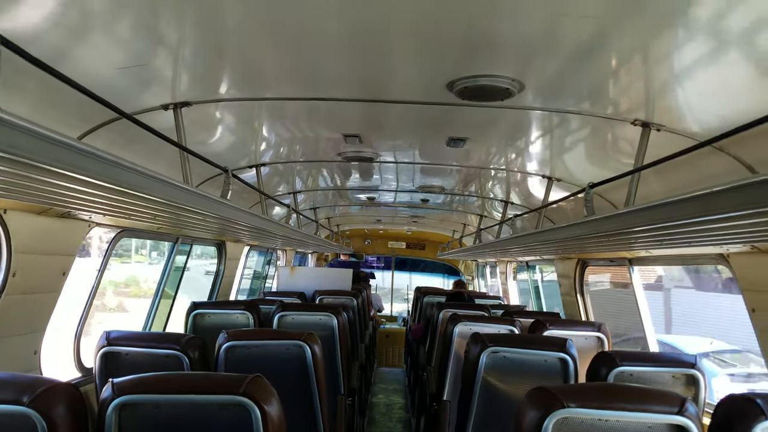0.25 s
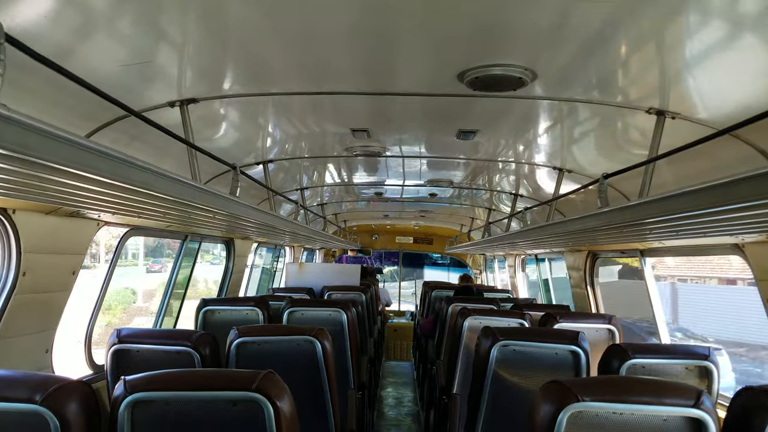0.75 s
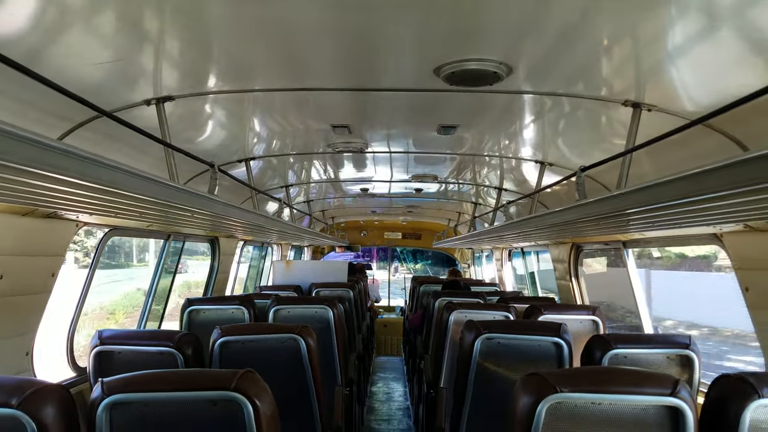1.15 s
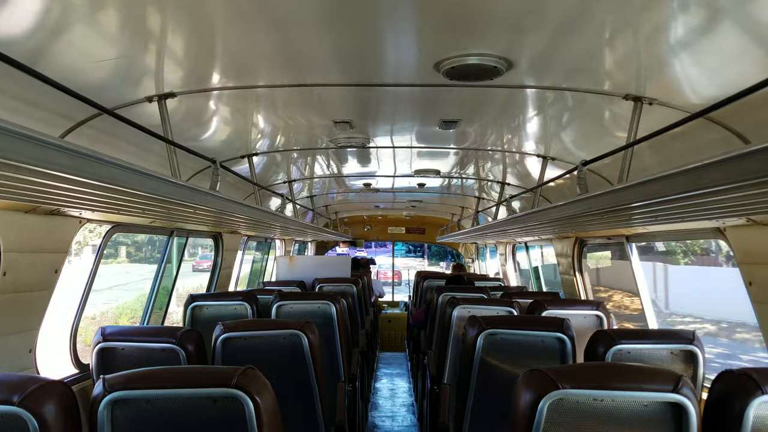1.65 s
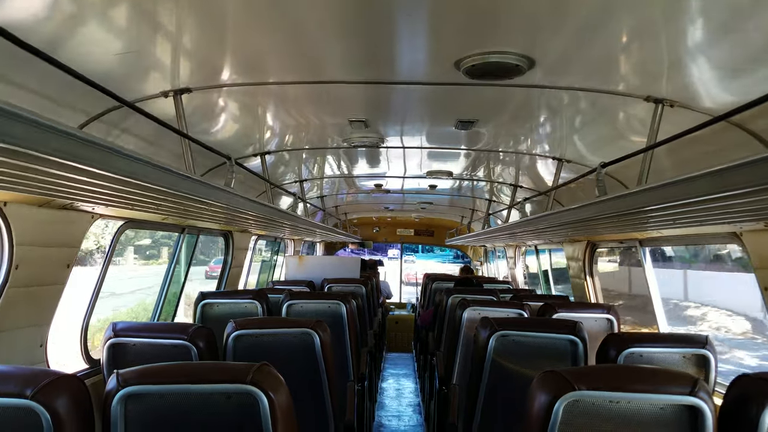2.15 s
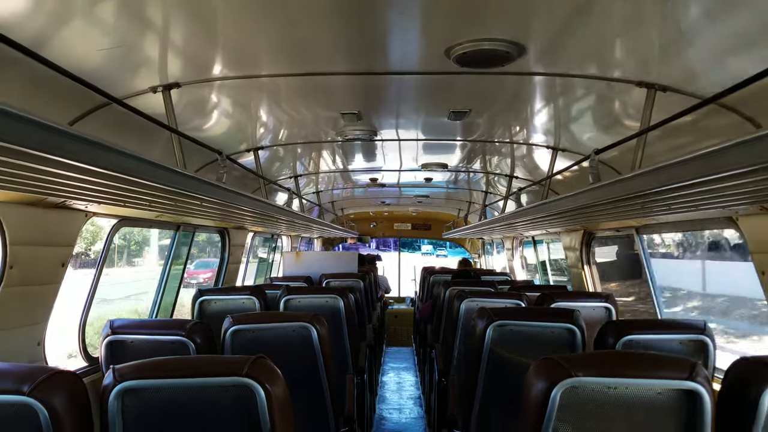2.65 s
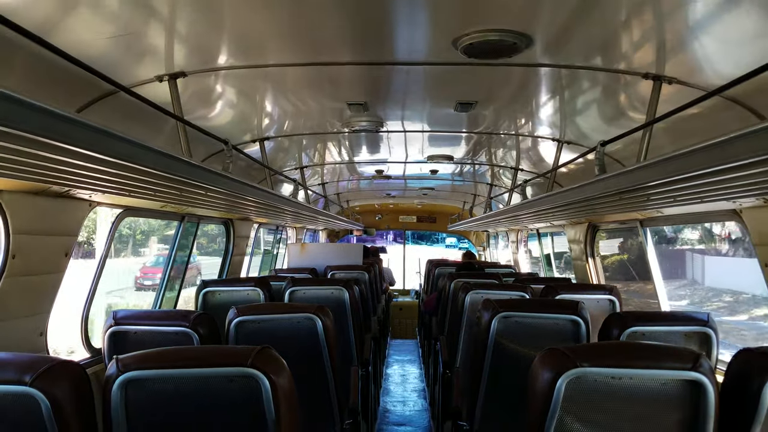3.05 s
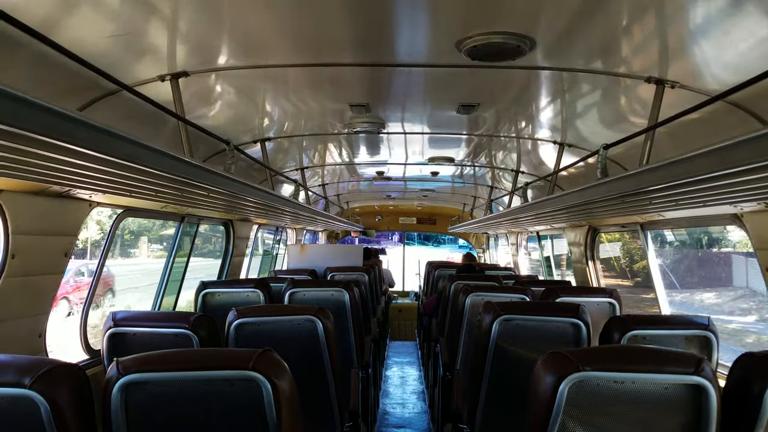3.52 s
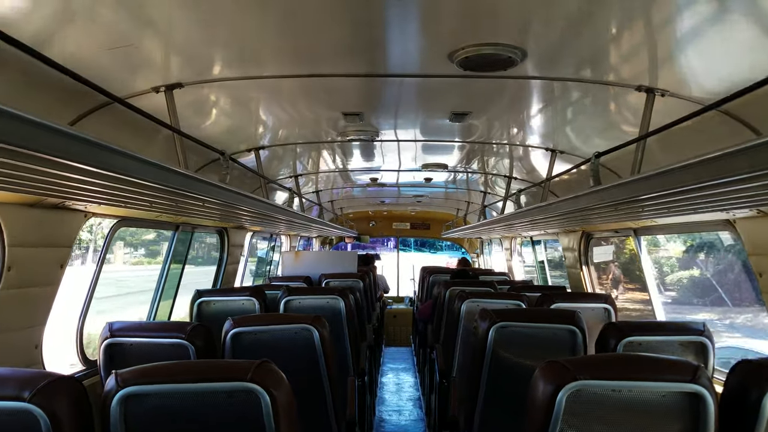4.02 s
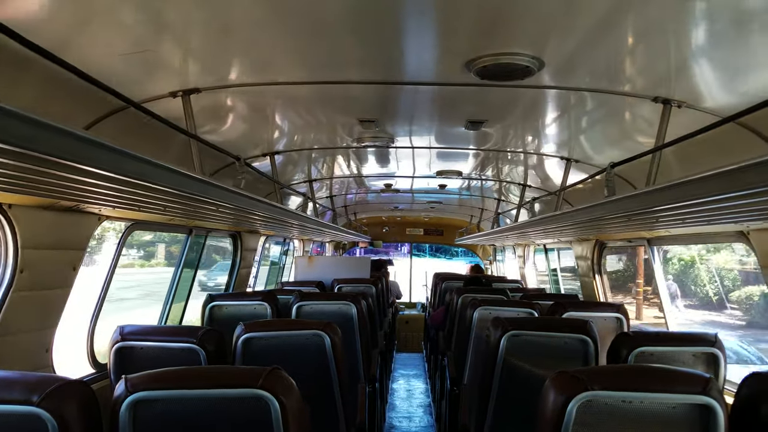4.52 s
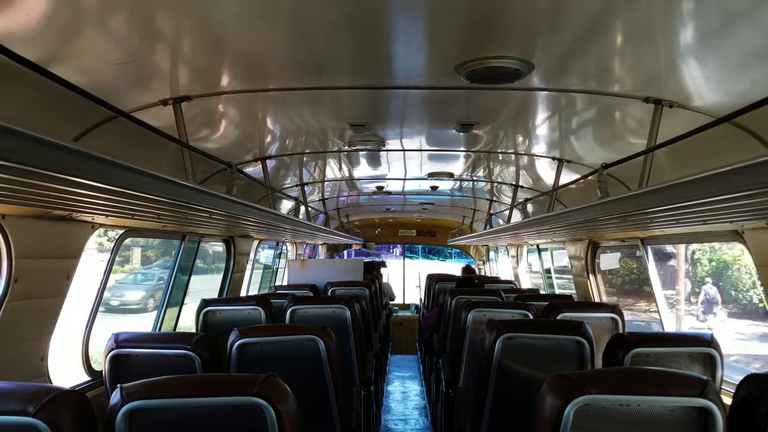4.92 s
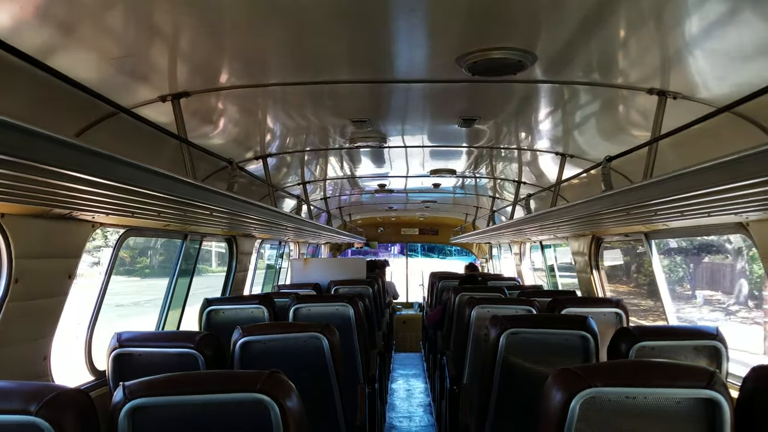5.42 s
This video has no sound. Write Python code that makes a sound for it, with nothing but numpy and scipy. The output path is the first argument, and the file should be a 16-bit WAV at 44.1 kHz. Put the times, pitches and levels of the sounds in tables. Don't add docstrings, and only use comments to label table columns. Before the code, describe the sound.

The sound starts already full: inside an old bus, a large diesel pulls at lowish revs, a deep, throbbing drone with several low tones beating together. From 0 to about 4.5 seconds its pitch climbs steadily, nearly doubling, and the cabin booms differently as each tone passes through its resonances. Beneath lie tyre rumble and soft road thuds, heavier after about 2.7 seconds; above, a grainy metallic roar, hissing valve clatter that grows with speed, humming panels and a faint high rattle of trim. Around 4.0 to 4.3 seconds a hard bump thuds, with a small bright tick and brief faint squeaks. The engine peaks near 4.5 seconds, loses its hard pull and coasts slightly lower to the end at about 5.7, with a thin gear whine more exposed from 4.6 and a flurry of fine rattles near 5.2. Enclosed stereo pickup, strong bass, loudest booms slightly rounded.

```python
import sys
import numpy as np
from scipy import signal
from scipy.fft import rfft, irfft, next_fast_len
from scipy.io import wavfile

SR = 44100
rng = np.random.default_rng(int(sys.argv[2]) if len(sys.argv) > 2 else 0)


def waveform_to_disk(signal):
    frames = np.transpose(np.atleast_2d(signal))
    scaled = np.clip(frames, -1, 1) * 32767
    samples = np.round(scaled).astype(np.int16)
    wavfile.write(sys.argv[1], SR, samples)


def gain_from_decibels(decibels):
    exponent = np.asarray(decibels, float) / 20
    return 10 ** exponent


N = 250047
TIME_S = np.arange(N) / SR
LENGTH = next_fast_len(N)
HZ = np.arange(1, LENGTH // 2 + 2) * SR / LENGTH

# [t/s, speed/turns per s]
CRANK_SPEED = [
    (0.0, 20.12),
    (0.8, 23.35),
    (2.0, 28.05),
    (3.6, 34.03),
    (4.3, 36.22),
    (4.52, 36.7),
    (4.72, 36.35),
    (5.2, 36.0),
    (5.45, 34.93),
    (5.67, 34.3),
]
MEAN_TURNS_PER_S = 30
FUEL_CUT_S, FUEL_FADE_S = 3.9, 0.63

# [multiple, level under load/dB, change when coasting/dB]
CRANK_MAINS = [(1, -1.4, 6.9), (3, -6, -1.3), (4, -4.5, -1), (6, -1.1, -16.8)]
SHAFT_MAINS = [(1, -.2, 1.5), (2, -1.7, -.8), (3, -6.1, .2), (4, -4.6, -3.5)]
# [f/Hz, width/Hz, level/dB rms]
CRANK_MODES = [(24.2, 4, -25.6), (36.1, 6, -26.5), (66, 25, -24), (83.7, 25, -15), (108.7, 2.2, -11),
               (122.7, 3.5, -18.5), (132.7, 6.4, -22.5), (147.8, 5, -14.5), (153.5, 18, -12),
               (195.9, 34, -12.5)]
SHAFT_MODES = [(40.5, 7.4, -21.5), (48.3, 6.2, -17), (80, 10, -23), (104.1, 8.5, -16), (118.3, 18, -9.5),
               (132, 11, -8), (137.8, 5.2, -8.5), (155.8, 6.1, -19.5), (164, 4, -21), (210, 25, -25)]
BETWEEN_MODES_DB = -38
# [multiple, level/dB]
CRANK_MINORS = [(2, 1), (5, 3.5), (7, -7), (8, -7), (9, 1.1), (10, -2), (11, -3.5), (12, -10.5)]
SHAFT_MINORS = [(5, 2), (6, -6), (8, -5.5)]
UPPER_MINORS = [(k, 0) for k in range(13, 27)]
# [f/Hz, level/dB rms]
CRANK_PATH = [(40, -38.5), (60, -33.5), (73, -28), (105, -36.5), (120, -25), (135, -28), (160, -23.5),
              (174, -34.5), (183, -23), (196, -27.5), (212, -23), (225, -33.5), (270, -32), (440, -36)]
SHAFT_PATH = [(140, -28), (156, -31.5), (167, -28.5), (180, -37), (195, -27), (214, -24), (230, -32),
              (260, -31.5), (330, -27), (420, -31.5)]
UPPER_PATH = [(250, -52), (400, -44), (570, -42), (700, -47), (900, -53.5), (1200, -57.5), (1500, -65)]
SHAFT_RATIO, GEAR_TEETH = 1.415, 27

# [f/Hz, density/dB per Hz]
THUD_SPECTRUM = [(8, -6.5), (20, -2.5), (40, -1), (65, -2), (85, -9.5), (120, -27)]
BOOM_SPECTRUM = [(45, -26.5), (70, -9), (100, 1.5), (140, 3.5), (180, -6), (210, 2), (260, -22.5),
                 (330, -29.5), (450, -51)]
ROAR_SPECTRUM = [(140, -35.5), (240, -2), (334, -8.5), (392, -7.5), (460, -12.5), (564, -8.5), (624, -16.5),
                 (770, -13.5), (1100, -24), (1430, -57), (2420, -120)]
CLATTER_SPECTRUM = [(530, -36), (900, -5), (1180, -1.5), (1390, -5.5), (1780, -6), (2200, -8), (2810, -11),
                    (4000, -19), (5300, -26.5), (5800, -31), (6150, -38.5), (7000, -40), (8200, -48),
                    (11000, -60.5)]
RATTLE_SPECTRUM = [(6000, -36.5), (8000, -19.5), (10000, -16), (10800, -11.5), (11900, -3), (12500, -2),
                   (13500, -1), (14800, -0.5), (15900, -5)]
# [f/Hz, width/Hz, level/dB]
PANELS = [(565.9, 17, -32), (659, 17, -44), (761.4, 22, -47.5), (384, 30, -35), (141, 27, -25),
          (2192, 34, -55.5), (4080, 53, -66.5)]

# [t/s, thud level/dB, boom level/dB]
BUMPS = [
    (.8, 0, 4.5),
    (1.5, 0, 5),
    (3.2, 2.5, 1),
    (3.95, 10, 2),
    (4.2, 8.5, 3.5),
    (4.65, -1.5, 7),
    (5.4, 0, 4.5),
    (5.67, -1, 4),
]
BUMP_S = 0.3
# [t/s, level/dB]
HUM_SWELLS = [
    (.05, 11),
    (.35, 7),
    (1.8, 8.5),
    (2.35, 7),
    (3.8, 5.5),
    (4.1, 7),
    (4.55, 8.5),
    (5.15, 7),
    (5.4, 3),
]
HUM_SWELL_S = 0.27
# [t/s, rattle rise/dB, decay/s]
SHAKES = [(0.552, 3.5, 0.013), (0.768, 3.5, 0.017), (1.62, 4.5, 0.0077), (1.696, 1.5, 0.011),
          (3.45, 4, 0.013), (3.662, 4.5, 0.038), (4.055, 7.5, 0.018), (4.078, 6.5, .015), (4.12, 5, 0.014),
          (4.429, 1, .012), (4.89, 5, 0.0094), (5.041, 4, .012), (5.184, 8.5, 0.019), (5.23, 6.5, 0.0084),
          (5.259, 0.5, 0.0061), (5.307, 4, 0.016)]
# [t/s, peak level/dB, ring f/Hz, left minus right/dB]
TICKS = [
    (4.0775, -31, 15200, 6),
    (4.0785, -43, 6500, 2.5),
    (4.0795, -44, 12400, 6),
    (4.1814, -45, 12900, 3),
]
# [t/s, length/s, f/Hz, width/Hz, level/dB, left minus right/dB]
SQUEAKS = [
    (4.06, .03, 5300, 500, -56, -4),
    (4.088, .014, 14900, 200, -50, 6),
    (4.19, .035, 5480, 400, -52, -5),
    (4.231, .026, 15120, 40, -48, 6),
    (4.285, .035, 5500, 400, -54, -5),
]

# [f/Hz, likeness/0-1, left lead/rad]
PORTS = [(30, 0.92, .03), (55, 1, .08), (80, 0.93, 0.22), (135, 0.89, 0.29), (200, 0.91, 0.13),
         (280, .94, 0.21), (430, .78, 0.54), (586, 0.7, 0.77), (750, 0.8, 0.33), (880, 0.8, 0.71),
         (1070, 0.05, 2.2), (1350, .36, 3.05), (1610, 0.4, 2.95), (2150, 0.01, 3.22)]
# [f/Hz, left minus right/dB]
LEAN = [(200, -0.5), (900, 1.5), (2000, 1), (2900, 4.5), (3500, 2.5), (4800, -7), (5500, -9.5),
        (6200, -1.5), (7600, -7), (9600, -3), (11000, 3.5), (12400, 10.5), (14400, -1.5), (15300, 0.5)]


def at_hz(points, hz, axis=1):
    table = np.array(points)
    return np.interp(np.log(hz), np.log(table[:, 0]), table[:, axis])


def rms_one(x):
    return x / np.sqrt(np.mean(x ** 2) + 1e-20)


def drift(rate_hz):
    step, settle = 40, 2000
    r = np.exp(-2 * np.pi * rate_hz * step / SR)
    noise = rng.standard_normal(N // step + settle + 2)
    slow = signal.lfilter([1], [1, -2 * r, r * r], noise)[settle:]
    return np.interp(np.arange(N) / step, np.arange(len(slow)), rms_one(slow - slow.mean()))


def ramp(start_s, length_s):
    return np.clip((TIME_S - start_s) / max(length_s, .01), 0, 1)


def swells(rows, length_s, axis=1):
    total_db = 0
    for row in rows:
        total_db = total_db + row[axis] * (ramp(row[0] - length_s, length_s) - ramp(row[0], length_s))
    return total_db


def crank_turns():
    s, turns = np.transpose(CRANK_SPEED)
    return np.interp(TIME_S, s, turns)


def law(level_db, db_per_octave, coast_db):
    octaves = np.log2(crank_turns() / MEAN_TURNS_PER_S)
    return level_db + db_per_octave * octaves + coast_db * ramp(FUEL_CUT_S, FUEL_FADE_S)


def resonance(x, hz, width_hz):
    r = np.exp(-np.pi * width_hz / SR)
    b = np.array([1, 0, -1]) * (1 - r * r) / 2
    return signal.lfilter(b, [1, -2 * r * np.cos(2 * np.pi * hz / SR), r * r], x)


def pan(pan_db):
    return gain_from_decibels([[pan_db / 2], [-pan_db / 2]])


def stereo_white():
    mid, side = rfft(rng.standard_normal((2, LENGTH)))
    alike = np.clip(at_hz(PORTS, HZ), 0, 1)
    sign = np.array([[1], [-1]])
    pair = np.sqrt(1 + alike) * mid + np.sqrt(1 - alike) * side * sign
    lead = np.exp(.5j * sign * at_hz(PORTS, HZ, axis=2))
    return pair * lead * gain_from_decibels(sign * at_hz(LEAN, HZ) / 2)


def patchy_noise(spectrum, patchy_db, rate_hz):
    low, high = spectrum[0][0], spectrum[-1][0]
    coloured = stereo_white() * gain_from_decibels(at_hz(spectrum, HZ)) * (HZ > low) * (HZ < high)
    bands_per_octave = 1.4
    place = bands_per_octave * np.log2(HZ / low)
    out = 0
    for k in range(int(bands_per_octave * np.log2(high / low)) + 2):
        band = irfft(coloured * np.clip(1 - abs(place - k), 0, 1), LENGTH)[:, :N]
        out = out + band * gain_from_decibels(patchy_db * drift(rate_hz))
    return rms_one(out)


def booming(modes, turns, mains):
    levels = []
    for k, db, coast_db in mains:
        power = gain_from_decibels(BETWEEN_MODES_DB) ** 2
        for top_hz, width_hz, mode_db in modes:
            power = power + (gain_from_decibels(mode_db) / (1 + (2 * (k * turns - top_hz) / width_hz) ** 2)) ** 2
        levels.append((k, law(db, 0, coast_db) + 10 * np.log10(power)))
    return levels


def through(path, turns, minors, effort_db):
    return [(k, db + effort_db + at_hz(path, k * turns)) for k, db in minors]


def orders(turns, levels, wobble_db, wander_rad, spread_rad):
    angle = 2 * np.pi * np.cumsum(turns) / SR
    out = 0
    for k, level_db in levels:
        lead = at_hz(PORTS, k * turns, axis=2) + spread_rad * k * rng.uniform(-1, 1)
        phase = k * angle + rng.uniform(0, 2 * np.pi) + wander_rad * drift(4.8)
        level = np.sqrt(2) * gain_from_decibels(level_db + wobble_db * drift(2.0))
        out = out + level * np.sin([phase + lead / 2, phase - lead / 2])
    return out


def gear_whine(turns):
    start_s, attack_s, hold_s, release_s, sing_db = 4.55, .15, 0.46, .15, 11
    singing = ramp(start_s, attack_s) - ramp(start_s + attack_s + hold_s, release_s)
    whine_db = law(-50, 10, 0) + sing_db * singing + .6
    return orders(GEAR_TEETH * turns, [(1, whine_db)], wobble_db=1.5, wander_rad=.25, spread_rad=.3)


def engine():
    turns = crank_turns()
    shaft_turns = SHAFT_RATIO * turns
    effort_db = law(0.27, 0.4, -1.1)
    crank_levels = booming(CRANK_MODES, turns, CRANK_MAINS)
    crank_levels += through(CRANK_PATH, turns, CRANK_MINORS, effort_db)
    shaft_levels = booming(SHAFT_MODES, shaft_turns, SHAFT_MAINS)
    shaft_levels += through(SHAFT_PATH, shaft_turns, SHAFT_MINORS, effort_db)
    upper_levels = through(UPPER_PATH, turns, UPPER_MINORS, effort_db)
    crank = orders(turns, crank_levels, wobble_db=1.5, wander_rad=.14, spread_rad=.02)
    shaft = orders(shaft_turns, shaft_levels, wobble_db=1.2, wander_rad=.12, spread_rad=.04)
    upper = orders(turns, upper_levels, wobble_db=4.0, wander_rad=.6, spread_rad=0.11)
    return gain_from_decibels(1.05) * (crank + shaft) + upper + gear_whine(turns)


def road():
    coarse_db = 8 * ramp(2.7, .4)
    thud_db = law(-34, -3, 0) + coarse_db + swells(BUMPS, BUMP_S)
    boom_db = law(-20, 1.5, -0.45) + swells(BUMPS, BUMP_S, axis=2)
    thud = gain_from_decibels(thud_db) * patchy_noise(THUD_SPECTRUM, patchy_db=1.0, rate_hz=4.4)
    boom = gain_from_decibels(boom_db) * patchy_noise(BOOM_SPECTRUM, patchy_db=-2.0, rate_hz=4.6)
    return thud + boom


def body_roar(jolts):
    level_db = law(-24, 0.95, 0.8) + 0.83 * jolts
    return gain_from_decibels(level_db) * patchy_noise(ROAR_SPECTRUM, patchy_db=1.5, rate_hz=12)


def shaken():
    total_db = 0
    for s, db, decay_s in SHAKES:
        age_s = TIME_S - s
        total_db = total_db + db * np.clip(age_s / .003, 0, 1) * np.exp(-np.clip(age_s, 0, None) / decay_s)
    return total_db


def valve_clatter(jolts):
    level_db = law(-31, 3.4, -.5) + 0.13 * shaken() + .15 * swells(BUMPS, BUMP_S) + 0.72 * jolts
    return gain_from_decibels(level_db) * patchy_noise(CLATTER_SPECTRUM, patchy_db=0.63, rate_hz=20.0)


def trim_rattle(jolts):
    level_db = law(-51, 3, -2.5) + shaken() + .6 * jolts + .5 * drift(30)
    return gain_from_decibels(level_db) * patchy_noise(RATTLE_SPECTRUM, patchy_db=-0.4, rate_hz=15)


def panel_hum():
    shake = irfft(stereo_white(), LENGTH)[:, :N]
    shake = shake + 2 * shake.mean(axis=0)
    hum = 0
    for hz, width_hz, db in PANELS:
        hum = hum + gain_from_decibels(db) * rms_one(resonance(resonance(shake, hz, width_hz), hz, width_hz))
    return gain_from_decibels(law(-3, 0.1, 0.55) + swells(HUM_SWELLS, HUM_SWELL_S)) * hum


def cabin_noise():
    jolts = drift(13)
    return road() + body_roar(jolts) + valve_clatter(jolts) + trim_rattle(jolts) + panel_hum()


def trim_squeaks():
    out = np.zeros((2, N))
    t = np.arange(round(.04 * SR)) / SR
    for s, length_s, hz, width_hz, db, pan_db in SQUEAKS:
        noise = rng.standard_normal((2, 2 * len(t)))
        rub = np.clip(t / .003, 0, 1) * np.clip((length_s - t) / .004, 0, 1)
        settled = resonance(resonance(noise, hz, width_hz), hz, width_hz)[:, len(t):]
        at = round(s * SR)
        out[:, at:at + len(t)] += gain_from_decibels(db) * rub * rms_one(settled) * pan(pan_db)
    return out


def trim_ticks():
    out = np.zeros((2, N))
    t = np.arange(round(.04 * SR)) / SR
    for s, db, hz, pan_db in TICKS:
        noise = rng.standard_normal((2, len(t)))
        crack = np.diff(noise, prepend=0) * np.exp(-t / .003) * (1 - np.exp(-t / .0012))
        tick = gain_from_decibels(-15) * crack + gain_from_decibels(10.0) * resonance(crack, min(hz, 15500), 1500)
        at = round(s * SR)
        out[:, at:at + len(t)] += gain_from_decibels(db - 6.0) * tick * pan(pan_db)
    return out


def scene():
    return engine() + cabin_noise() + trim_squeaks() + trim_ticks()


def roll_off(x):
    return signal.sosfilt(signal.butter(12, 15660, fs=SR, output="sos"), x)


def record(dry):
    ceiling = 1.04
    rounded = dry / (1 + np.abs(dry / ceiling) ** 4) ** .25
    return roll_off(rounded)


dry = scene()
out = record(dry)
waveform_to_disk(out)
```